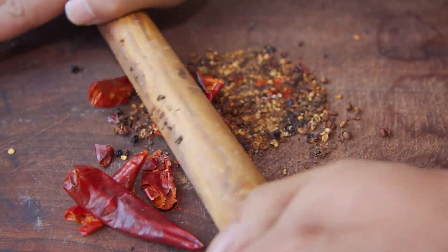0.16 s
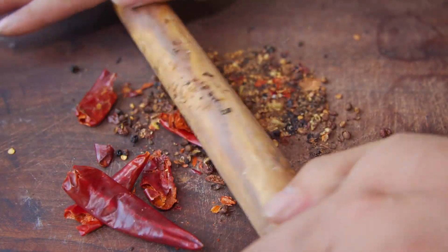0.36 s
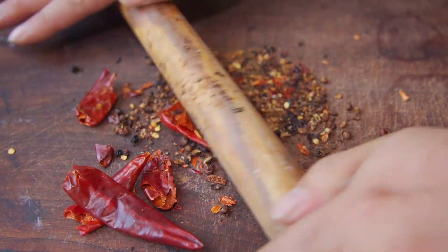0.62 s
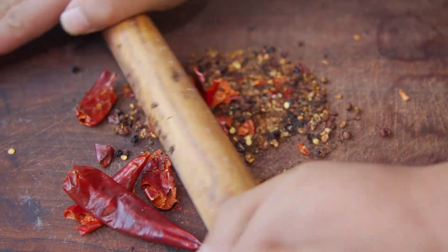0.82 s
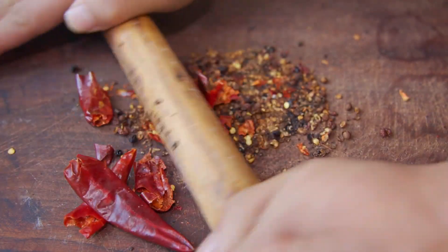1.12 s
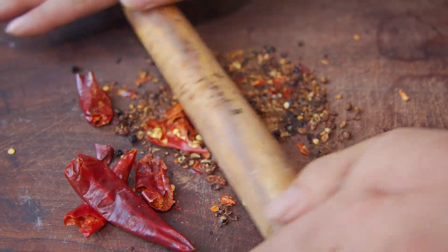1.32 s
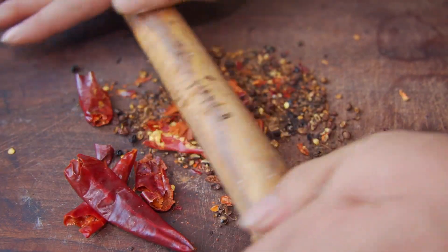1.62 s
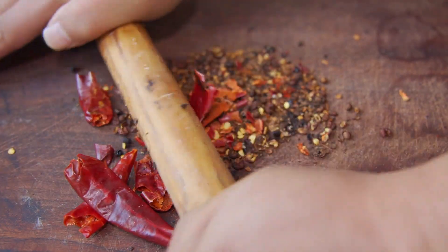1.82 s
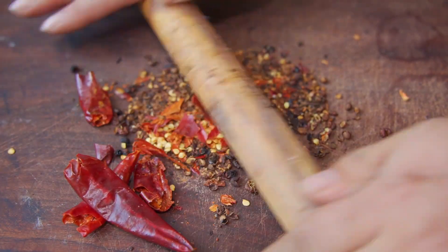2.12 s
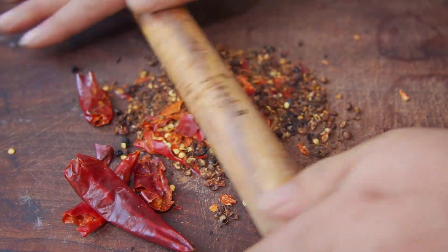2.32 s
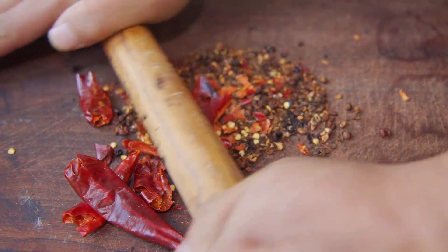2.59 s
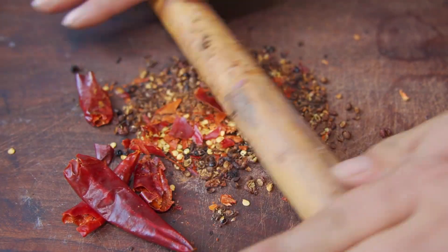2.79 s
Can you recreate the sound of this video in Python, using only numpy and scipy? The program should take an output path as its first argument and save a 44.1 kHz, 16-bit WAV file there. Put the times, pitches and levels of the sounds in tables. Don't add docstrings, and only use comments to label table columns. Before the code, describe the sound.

A wooden rolling pin crushes dried chilies and peppercorns on a board, crackling, crunching and knocking

```python
import sys
import numpy as np
from scipy import signal
from scipy.io import wavfile
from scipy.ndimage import uniform_filter1d

SR = 44100
rng = np.random.default_rng(int(sys.argv[2]) if len(sys.argv) > 2 else 0)


def attenuation_scalar(level_db):
    decades = np.asarray(level_db, float) / 20
    return 10 ** decades


def wav_record(signal):
    frames = np.transpose(np.atleast_2d(signal))
    bounded = np.clip(frames, -1, 1)
    quanta = np.round(bounded * 32767).astype(np.int16)
    wavfile.write(sys.argv[1], SR, quanta)


N = 130095

# start_s, hold_s, pressure_db, easing_db_per_s
SHOVES = [(0, 0.086, -46, 44), (0.202, 0.25, -41.5, -5), (0.52, 0.097, -42.5, 93), (0.676, 0.074, -37, 103),
          (0.846, 0.025, -41, 52), (0.917, 0.095, -38.5, 207), (1.114, 0.15, -37.5, 82),
          (1.386, 0.053, -36.5, 291), (1.532, 0.21, -38.5, 82), (1.855, 0.032, -46.5, 247),
          (1.985, 0.069, -40, 82), (2.119, 0.072, -38.5, 209), (2.268, 0.23, -38, 335),
          (2.612, 0.011, -47.5, 98), (2.662, 0.041, -43.5, 176), (2.755, 0.094, -37, 177),
          (2.907, .05, -42, 10)]
# time_s, level_db
SKIN_SHARE = [(0, -4.5), (.15, 6), (.2, 1.5), (.23, 4), (.32, 5), (.45, -5), (.55, -9.5), (.8, -8.5),
              (1.1, -10), (1.5, -14.5), (1.8, -9), (2.2, -14.5), (2.95, -18)]
# time_s, level_db
SWAY_LEVEL = [(0, -42), (.15, -48), (1.0, -53), (1.1, -46), (1.3, -48.5), (1.4, -39), (1.47, -50.5),
              (1.95, -57.5), (2.05, -46.5), (2.501, -49.5), (2.87, -43), (2.95, -50)]

# start_s, snap_db, board_knock_db, table_push_db
CORNS = [(0.098, -31, -30.5, -71), (0.1805, -58, -32.5, -54), (0.2068, -23.5, -57, -53),
         (0.2307, -46, -52, -56), (0.2856, -24.5, -32, -51.5), (0.3288, -31, -33, -67),
         (0.3736, -24, -29, -49), (0.4122, -28, -29, -49), (0.4398, -26.5, -29, -64),
         (0.4885, -27, -30, -57), (0.506, -34, -28, -56), (0.521, -48, -23, -36.5),
         (0.547, -18.5, -22, -35.5), (0.5831, -20.5, -25.5, -50), (0.6764, -15.5, -22.5, -40),
         (0.7564, -26, -27, -47), (0.8512, -28.5, -53, -66), (0.9062, -15, -24, -52),
         (0.9257, -31, -21, -47), (0.955, -13.5, -44, -41), (0.9781, -16.5, -28, -48),
         (1.0074, -27.5, -31.5, -60), (1.0982, -26, -62, -69), (1.1246, -15, -28, -46.5),
         (1.164, -15.5, -23.5, -42), (1.185, -17, -29, -52), (1.2032, -21, -22, -50),
         (1.2187, -22, -25, -44), (1.2339, -22, -33, -66), (1.2571, -22.5, -28.5, -44),
         (1.277, -19, -23, -47), (1.4007, -27, -24.5, -52), (1.4223, -39, -20, -45),
              (1.5249, -55, -18, -39.5), (1.5555, -19, -25, -55), (1.5685, -16.5, -25, -57),
              (1.6239, -14.5, -27, -44), (1.6516, -16.5, -43, -47), (1.661, -12, -26, -54),
              (1.744, -14.5, -31, -57), (1.9883, -17, -24.5, -41), (2.1128, -16.5, -23, -42.5),
              (2.1509, -25, -27, -51), (2.1613, -49, -18, -66), (2.1809, -19, -23, -40),
              (2.2689, -19, -25, -47), (2.2895, -52, -20, -43.5), (2.3022, -17.5, -35, -50),
              (2.32, -24, -30, -42), (2.3479, -16, -30, -67), (2.3889, -20.5, -26.5, -58),
              (2.5152, -24, -35, -53), (2.6174, -31, -41.5, -68), (2.6699, -26.5, -28, -67),
              (2.7693, -39, -37, -55), (2.7947, -35, -28.5, -49), (2.8045, -47, -27.5, -63),
              (2.812, -18.5, -19, -45), (2.9074, -29, -34.5, -58), (2.9404, -29, -29, -61)]
# start_s, snap_db, board_knock_db
SEEDS = [(0.6353, -34, -53), (0.7436, -27.5, -38), (1.3436, -33.5, -33.5), (1.7284, -27.5, -35),
         (1.7372, -21.5, -38), (1.8101, -29, -57), (1.8542, -32.5, -38.5), (1.926, -44.5, -55),
         (2.0024, -29, -29.5), (2.4194, -27.5, -30.5), (0.711, -37, -33), (1.538, -36, -28),
         (1.98, -38, -41), (2.0436, -32, -38), (2.4712, -27.5, -32), (2.479, -36, -38),
         (2.4974, -30.5, -28), (2.526, -32, -41), (2.755, -44, -45), (1.765, -29, -32), (1.4661, -48, -38),
         (1.1198, -35, -46), (1.2663, -30, -31), (1.685, -26, -30), (2.284, -33, -28), (2.338, -35, -33),
         (2.821, -35, -30), (2.6934, -29, -46), (2.9288, -29, -35)]
# start_s, peak_db, pitch_hz
FLAKES = [(0.0326, -33, 4180), (0.0506, -42, 3880), (0.0564, -36, 9800), (0.067, -34, 3500),
          (0.0715, -28.5, 7470), (0.0814, -29, 4280), (0.0924, -28.5, 5030), (0.1098, -26, 8700),
          (0.1194, -28, 8740), (0.1274, -27, 6790), (0.1634, -31.5, 4600), (0.1804, -40, 4270),
          (0.2056, -18, 8500), (0.217, -39, 5100), (0.2308, -22, 8700), (0.2474, -30, 8400),
          (0.2711, -17.5, 7400), (0.2968, -25, 8000), (0.3112, -28, 7240), (0.3414, -32, 8800),
          (0.3566, -25, 7000), (0.385, -24, 8700), (0.4038, -26, 8820), (0.7114, -31, 4580),
          (0.784, -44, 6240), (0.8147, -36, 4610), (1.7966, -25, 4610), (1.8397, -39, 4540),
          (1.8724, -37, 4560), (1.8904, -35, 3850), (1.9014, -38, 4480),
          (0.2273, -28, 8600), (.646, -30, 12500), (.656, -33, 9000), (.662, -31, 10000),
          (.667, -28, 12500), (1.8804, -40, 6000), (1.9395, -47, 2600), (2.647, -40, 4600),
          (.7433, -29, 12500)]

# pitch_hz, width_hz, level_db
PIN_MODES = [(1160, 157, 1), (2034, 107, -2), (2586, 220, -7), (3250, 190, 6), (4600, 82, -8),
             (6340, 140, -10), (8460, 650, -13.5)]
# pitch_hz, width_hz, level_db
BOARD_MODES = [(756, 150, -1.5), (867, 160, -2.5), (1004, 106, -0.6), (1164, 106, 4), (1292, 133, -1.3),
               (1603, 320, -2.5), (2280, 910, 3.5)]
# pitch_hz, width_hz, level_db
TABLE_MODES = [(88.1, 24, 0.15), (167.7, 36.6, -1.5), (235, 36, -3.5), (309, 30, -3), (426.6, 62, -3),
               (506, 89, -8.5)]

# frequency_hz, level_db
SHELL_COLOUR = [(880, -65.5), (1500, -5), (2780, -7), (4300, -0.07), (5550, -7), (14000, -20)]
# frequency_hz, level_db
SKIN_COLOUR = [(1470, -65), (2500, -9), (3260, -18.5), (3530, -9.5), (8640, -0.5), (10300, -8.5),
               (14000, -3.5)]
# frequency_hz, level_db
AIR_COLOUR = [(60, 1), (300, 0.5), (600, -1), (1100, 3), (2500, -5.5), (9000, -22), (15000, -15)]
# frequency_hz, level_db
WOOD_RADIATES = [(300, -7.5), (600, -12.5), (800, -0.5), (15000, 0)]
# frequency_hz, level_db
TABLE_RADIATES = [(45, -19), (75, -2), (90, 0), (180, 2), (450, -1), (600, -3), (5000, -8.5)]


def evened(x):
    return x / np.sqrt(np.mean(x ** 2) + 1e-20)


def colour(x, points):
    points_hz, points_db = np.transpose(points)
    hz = abs(np.fft.fftfreq(4096, 1 / SR))
    db = np.interp(np.log(hz + 1), np.log(points_hz), points_db, left=-60)
    log_gain = db * np.log(10) / 20
    taps = np.fft.ifft(np.exp(np.conj(signal.hilbert(log_gain)))).real[:2048]
    return signal.oaconvolve(x, taps / np.linalg.norm(taps))[:N]


def ring(x, modes, place_db=0, rise_s=1e-5):
    has_bass = modes[0][0] < 200
    t = np.arange(SR // 4 if has_bass else SR // 20) / SR
    luck = rng.standard_normal((len(modes), 2))
    detune = 0.021 if place_db > 0 else 0
    body = np.zeros(len(t))
    for (hz, width_hz, db), (weight, shift) in zip(modes, luck):
        size = attenuation_scalar(db + place_db * weight) * np.sqrt(width_hz)
        decay = np.exp(-np.pi * width_hz * t)
        body += size * decay * np.sin(2 * np.pi * hz * (1 + detune * shift) * t)
    body *= 1 - np.exp(-t / rise_s)
    return signal.oaconvolve(x, body / np.linalg.norm(body))[:N]


def clicks(per_s, spread_db, clump_db, rub_db):
    clumps = evened(uniform_filter1d(uniform_filter1d(rng.standard_normal(N), 300), 300))
    size = attenuation_scalar(spread_db * np.minimum(rng.exponential(1, N), 3.5))
    sign = np.sign(rng.standard_normal(N))
    ticks = evened(size * sign * (rng.random(N) < per_s / SR))
    rubbing = attenuation_scalar(rub_db) * rng.standard_normal(N)
    return evened(attenuation_scalar(clump_db * clumps) * (ticks + rubbing))


def pressure_db():
    t, rows = np.arange(N) / SR, np.array(SHOVES)
    current = np.maximum(np.searchsorted(rows[:, 0], t, "right") - 1, 0)
    start_s, hold_s, db, ease = rows[current].T
    return uniform_filter1d(db - ease * np.maximum(t - start_s - hold_s, 0), 200, origin=90)


def skin_db():
    return np.interp(np.arange(N) / SR, *np.transpose(SKIN_SHARE))


def grind():
    pressure = pressure_db()
    force = attenuation_scalar(pressure) * clicks(per_s=1200, spread_db=3.5, clump_db=2.06, rub_db=-4)
    weight = force * attenuation_scalar(0.36 * (pressure + 36) - 0.13 * (skin_db() + 16.5))
    place = np.repeat(rng.integers(0, 6, N // 200 + 1), 200)[:N]
    wood = np.zeros(N)
    for k in range(6):
        here = force * (place == k)
        wood += attenuation_scalar(-2.5) * ring(here, BOARD_MODES[1:6], 4.5)
        wood += attenuation_scalar(-6) * ring(here, PIN_MODES, 5.0)
    wood = colour(colour(wood, WOOD_RADIATES), WOOD_RADIATES)
    table = colour(ring(weight, TABLE_MODES, rise_s=0.0013), TABLE_RADIATES)
    return wood + attenuation_scalar(-7.0) * colour(force, SHELL_COLOUR) + attenuation_scalar(-16.0) * table


def skins():
    crackle = clicks(per_s=2500, spread_db=3, clump_db=3.0, rub_db=0.5)
    return attenuation_scalar(pressure_db() + skin_db()) * colour(crackle, SKIN_COLOUR)


def sway():
    time_s, db = np.transpose(SWAY_LEVEL)
    mode = [(33, 13, 0)]  # pitch_hz, width_hz, level_db
    rocking = evened(ring(ring(rng.standard_normal(N), mode), mode))
    return rocking * attenuation_scalar(np.interp(np.arange(N) / SR, time_s, db))


def flakes():
    t, out = np.arange(400) / SR, np.zeros(N + SR)
    rows = FLAKES
    for (start_s, db, hz), noise in zip(rows, rng.standard_normal((len(rows), 400))):
        burst = noise * np.exp(-t / 0.00098)
        tick = ring(burst, [(hz, 0.21 * hz, 0)])
        out[round(start_s * SR):][:len(tick)] += attenuation_scalar(db - 7) * tick / abs(tick).max() * 2
    return out[:N]


def corns():
    t = np.arange(3000) / SR
    snap, fold, wood, push = np.zeros((4, N + 15000))
    skin = skin_db()
    snap_s, crumble_t60_s, push_s = 0.0015, 0.15, 0.0039
    shape = np.exp(-(t / snap_s) ** 1.1) + attenuation_scalar(-25 - 60 * t / crumble_t60_s)
    knock_lag_s, knock_s = 0.000911, 0.00029
    blow = np.exp(-.5 * ((t - knock_lag_s) / knock_s * 4) ** 2)
    rocking = 1 + 1.5 * np.cos(2 * np.pi * TABLE_MODES[0][0] * t)
    settle = blow + 0.13 * t / push_s * np.exp(-t / push_s) * rocking
    ticking_seeds = [(*row, -80) for row in SEEDS]
    for start_s, snap_db, knock_db, push_db in CORNS + ticking_seeds:
        at, noise = round(start_s * SR) + 20, rng.standard_normal((2, 3000))
        noise[0, 0] = attenuation_scalar(7.5)
        cushion = attenuation_scalar(-max(skin[at] + 8, 0))
        crack = attenuation_scalar(snap_db) * shape * noise[0]
        knock = attenuation_scalar(knock_db) * (blow + 0.23 * shape * noise[1])
        pin = attenuation_scalar(-4.5) * ring(crack, PIN_MODES, 1.6) * cushion
        board = attenuation_scalar(0.5) * ring(knock, BOARD_MODES, 4.3, rise_s=0.0004)
        knocked_pin = attenuation_scalar(-1.5) * ring(knock, PIN_MODES[:4], 1.2)
        sound = pin + board + knocked_pin
        snap[at:at + 3000] += crack * cushion
        fold[at:at + 3000] += crack * attenuation_scalar(skin[at])
        wood[at:at + len(sound)] += sound
        thud = ring(attenuation_scalar(push_db) * settle, TABLE_MODES, 3.4, rise_s=0.0028)
        push[at:at + len(thud)] += thud
    shells = attenuation_scalar(-3.5) * colour(snap, SHELL_COLOUR) + attenuation_scalar(-2.0) * colour(fold, SKIN_COLOUR)
    return shells + colour(wood, WOOD_RADIATES) + attenuation_scalar(-0.5) * colour(push, TABLE_RADIATES)


def room(x):
    t, t60_s = np.arange(SR // 3) / SR, .17
    sign = rng.choice([-1., 1.], len(t))
    echoes = sign * (rng.random(len(t)) < .05)
    tail = echoes * attenuation_scalar(-60 * t / t60_s) * (t > .004)
    return signal.fftconvolve(x, tail / np.linalg.norm(tail))[:N]


def scene():
    near = grind() + skins() + corns() + flakes()
    air = attenuation_scalar(-60.5) * colour(rng.standard_normal(N), AIR_COLOUR)
    return (near + attenuation_scalar(-9.5) * room(near) + sway() + air)[None]


def top_cut(x):
    return signal.sosfilt(signal.butter(12, 15460, fs=SR, output="sos"), x)


def record(dry):
    ceiling, edge_hz = .2, 14300
    limited = ceiling * np.tanh(dry / ceiling)
    edge = signal.firwin(601, edge_hz, window=("kaiser", 3), fs=SR)[None]
    mix = signal.oaconvolve(limited, edge, "same")
    return top_cut(mix)


dry = scene()
out = record(dry)
wav_record(out)
```